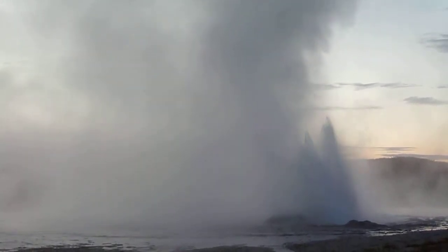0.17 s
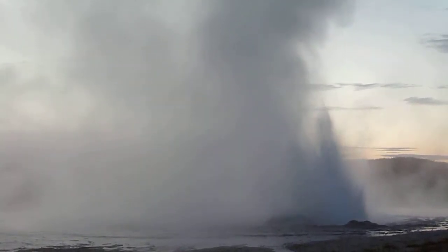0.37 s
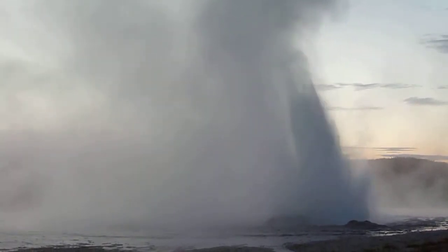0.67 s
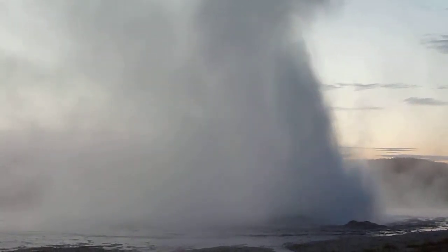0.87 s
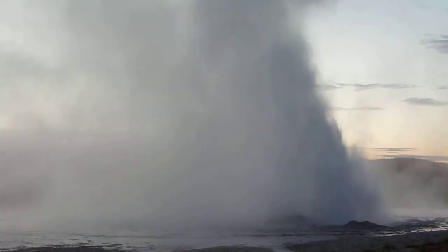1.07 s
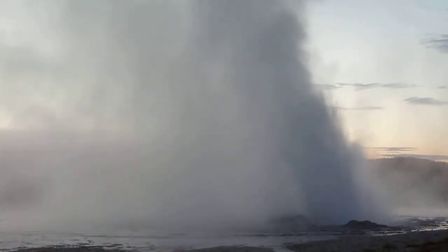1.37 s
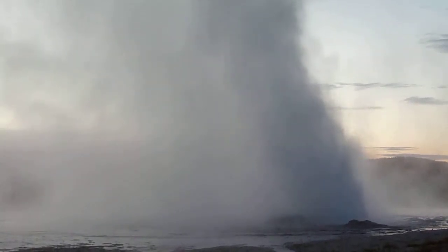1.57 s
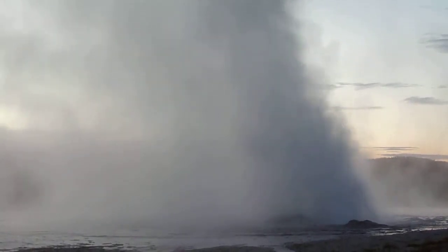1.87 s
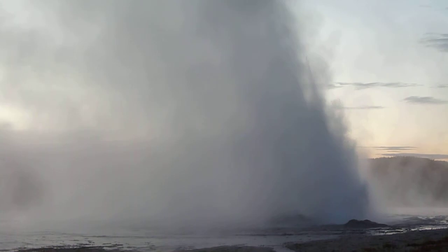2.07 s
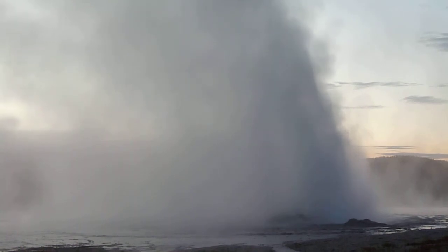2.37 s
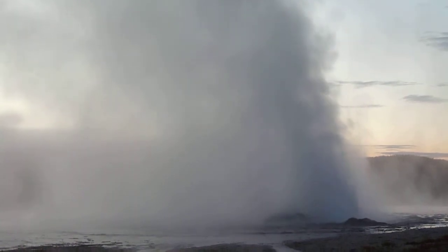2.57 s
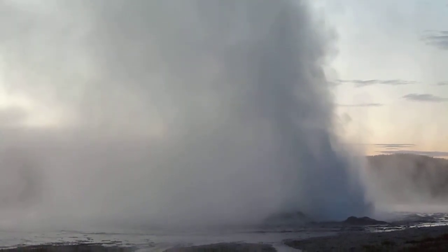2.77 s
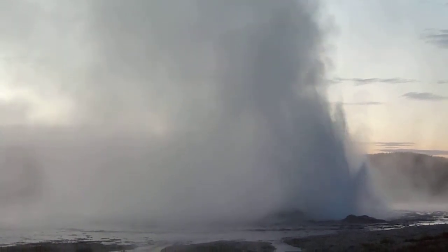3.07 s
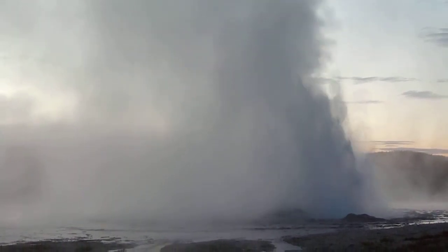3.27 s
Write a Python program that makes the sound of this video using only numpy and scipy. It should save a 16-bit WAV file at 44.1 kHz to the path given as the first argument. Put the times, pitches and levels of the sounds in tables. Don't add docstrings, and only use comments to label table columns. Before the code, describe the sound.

Geyser eruption outdoors, already under way and never stopping: dense watery hiss with fine crackle, airy jet roar and deep throbbing steam bursts, slightly dull on top, with occasional tiny handling ticks on the stereo microphones.

```python
import sys
import numpy as np
from scipy import signal
from scipy.fft import rfft, irfft
from scipy.io import wavfile
from scipy.ndimage import uniform_filter1d

SR = 44100
rng = np.random.default_rng(int(sys.argv[2]) if len(sys.argv) > 2 else 0)


def volts_from_decibels(level):
    exponent = np.asarray(level, float) / 20
    return 10 ** exponent


def dump(signal):
    limited = np.clip(np.atleast_2d(signal).T, -1, 1)
    pcm = np.round(limited * 32767).astype(np.int16)
    wavfile.write(sys.argv[1], SR, pcm)


N = 150822
HZ = np.fft.rfftfreq(N, 1 / SR)

# frequency in Hz, density in dB per Hz.
SCATTER_SPECTRUM = [(60, 0), (250, 2), (600, 3), (1000, 2), (2000, 0), (4500, 1.5), (6200, -2), (7400, -9)]
# start in seconds, peak in dB, centre in Hz, rattle hold in seconds,
# left over right in dB.
HOUSING_TICKS = [
    (.4152, -19.5, 1300, .0005, 3),
    (.4234, -23, 1200, .001, 2),
    (.4366, -17, 1300, .001, 2),
    (1.3885, -17.5, 3600, .005, 5),
    (1.4074, -22, 2300, .006, 5),
    (1.6560, -13.5, 3400, .016, 5),
    (2.4360, -28, 1200, .0005, 2),
    (2.4645, -28, 5200, .004, 0),
    (2.4705, -25.5, 850, .005, 2),
]
# frequency in Hz, level in dB, 60 dB decay time in seconds.
HOUSING_MODES = [(450, -2, .012), (800, -1, .012), (1150, -1, .009), (1580, 0, .016), (2000, -2, .006),
                 (2450, -1, .007), (2900, -1, .007), (3700, 0, .008), (4500, -2, .008), (5300, 2, .009),
                 (6100, -3, .006), (6800, -5, .006)]
# frequency in Hz, density in dB per Hz.
SPRAY_SPECTRUM = [(900, -5.5), (1500, -3.5), (2100, -4), (2800, 1.5), (5300, -1.5), (6800, -4.5),
                  (7500, -11.5), (7850, -29)]
# time in seconds, level in dB.
SPRAY_FALL = [
    (0.0, -40),
    (0.31, -39.5),
    (1.56, -38),
    (1.66, -39),
    (2.37, -41),
    (2.76, -39),
    (3.42, -40.5),
]
# time in seconds, lift in dB, length in seconds.
SPLASHES = [
    (0.27, 3.5, 0.0069),
    (0.378, 4, 0.0096),
    (0.401, 3.5, 0.02),
    (1.93, 2.5, 0.013),
    (2.108, 3, .04),
    (2.45, 1.5, .06),
    (2.722, 1.5, .015),
    (2.8, 2, 0.1),
    (2.951, 4, .02),
    (3.253, 2, .04),
]
# frequency in Hz, density in dB per Hz.
ROAR_SPECTRUM = [(200, -7.5), (280, -3), (320, -3.5), (560, -1.5), (695, -10), (1050, -10), (1280, -19.5),
                 (1500, -21.5)]
# frequency in Hz, density in dB per Hz.
RUMBLE_SPECTRUM = [(22, -16), (60, 0), (100, 0), (156, 0), (194, -1), (263, -2), (301, -14.5), (360, -24)]
# frequency in Hz, width in Hz, lift in dB.
VENT_RINGS = [(150, 53, 2.5), (241.7, 34, 3), (264, 22, 2.5)]
# time in seconds, lift in dB, length in seconds.
STEAM_BURSTS = [(.05, 0, 0.11), (.2, 2.5, 0.11), (.36, 8.5, 0.1), (.42, 6.5, 0.085), (.52, 6.5, 0.11),
                (.68, 6.5, 0.079), (.87, 4, 0.31), (1.02, 3, .1), (1.27, 9.5, 0.069), (1.345, 12.5, 0.074),
                (1.41, 10, 0.079), (1.52, 6.5, .07), (1.61, 7.5, 0.075), (1.69, 5, 0.067), (1.81, 7.5, .06),
                (1.87, 4, 0.072), (1.98, 2, 0.088), (2.11, 7, 0.062), (2.3, 4, 0.049), (2.44, 3.5, 0.043),
                (2.52, 5.5, 0.098), (2.72, 6, 0.12), (2.81, 9.5, .08), (2.9, 3.5, 0.058), (3.035, 8, .04),
                (3.15, 8.5, .06), (3.23, 5.5, 0.11)]
# delay in ms, strength as a ratio, centre in Hz, width in Hz.
NEAR_ECHOES = [(2.367, 0.38, 1750, 590), (2.17, 0.41, 5360, 1800)]
# frequency in Hz, left lead in radians.
LEFT_LEAD = [(0, 0.08), (2330, 0.71), (3450, 0.5), (3790, 0.6), (7410, 0.16), (8350, 0.05)]
# frequency in Hz, left over right in dB.
LEFT_TILT = [(60, 1.5), (160, 0.5), (430, 1.5), (1150, 1.5), (3070, -1), (8200, 0.5)]
# frequency in Hz, level in dB.
MIRROR_IMAGE = [(8000, 0.5), (8250, -5), (8500, -20), (8850, -19), (9000, -58), (9100, -90)]


def rms_one(x):
    return x / np.sqrt(np.mean(x ** 2) + 1e-20)


def at_hz(points, hz):
    f, v = np.transpose(points)
    return np.interp(np.log(hz + 1), np.log(f + 1), v)


def drift(rate_hz):
    pole = np.exp(-80 * np.pi * rate_hz / SR)
    white = rng.standard_normal(N // 40 + 2002)
    slow = signal.lfilter([1], [1, -2 * pole, pole * pole], white)[2000:]
    return np.interp(np.arange(N) / 40, np.arange(len(slow)), rms_one(slow))


def colour(x, points, skirt_db):
    below, above = points[0][0] / (HZ + 1), HZ / points[-1][0]
    octaves_beyond = np.maximum(0, np.log2(np.maximum(below, above)))
    gain_db = at_hz(points, HZ) - skirt_db * octaves_beyond
    return rms_one(irfft(rfft(x) * volts_from_decibels(gain_db), N))


def patchy(low_hz, high_hz, shared_db, own_db, shared_hz, own_hz):
    shared = drift(shared_hz)
    white = rfft(rng.standard_normal(N))
    out = np.zeros(N)
    for centre in np.arange(np.log2(low_hz), np.log2(high_hz), .5):
        band = np.clip(1 - 2 * abs(np.log2(HZ + 1) - centre), 0, 1)
        flicker_db = shared_db * shared + own_db * drift(own_hz)
        out += volts_from_decibels(flicker_db) * irfft(white * band, N)
    return out


def swells(rows):
    t = np.arange(N) / SR
    return sum(db * np.exp(-(2 * (t - s) / length_s) ** 2) for s, db, length_s in rows)


def scattered(fall_db):
    whites = rng.standard_normal((2, N))
    around = np.array([colour(white, SCATTER_SPECTRUM, skirt_db=50.5) for white in whites])
    return volts_from_decibels(-49 + fall_db - fall_db.mean()) * around


def ring_housing(push, centre_hz):
    span_octaves = .5 + .3 * centre_hz / 1000
    ring = np.zeros_like(push)
    for k, (mode_hz, mode_db, t60_s) in enumerate(HOUSING_MODES):
        r, w = volts_from_decibels(-60 / (t60_s * SR)), 2 * np.pi * mode_hz / SR
        near = np.exp(-.5 * (np.log2(mode_hz / centre_hz) / span_octaves) ** 2)
        mode = signal.lfilter([0, np.sin(w)], [1, -2 * r * np.cos(w), r * r], push)
        ring += (-1) ** k * near * volts_from_decibels(mode_db) * mode
    return ring


def housing_ticks():
    contact_s, click_db = .0007, 16
    rattle_db, rattle_fade_s = -10.5, .002
    out, t = np.zeros((2, N + SR)), np.arange(3000) / SR
    contact = t / contact_s * np.exp(1 - t / contact_s)
    for s, peak_db, centre_hz, rattle_s, pan_db in HOUSING_TICKS:
        noise = rng.standard_normal((3, len(t)))
        rattle = volts_from_decibels(rattle_db) * np.exp(-np.maximum(t - rattle_s, 0) / rattle_fade_s)
        push = (noise[0] + .5 * noise[1:]) * (contact + rattle)
        push[:, round(contact_s * SR)] += volts_from_decibels(click_db)
        ring = ring_housing(push, centre_hz)
        side_db = np.array([[.5], [-.5]]) * pan_db
        i = int(s * SR)
        out[:, i:i + len(t)] += ring / abs(ring.mean(axis=0)).max() * volts_from_decibels(peak_db + side_db)
    return out[:, :N]


def spray(fall_db, swing_db):
    drops_per_s, drop_spread_db, drops_db = 1200, 5, -18.5
    surge_share = 0.054
    sizes = volts_from_decibels(drop_spread_db * np.minimum(rng.exponential(1, N), 5)) * rng.choice([-1, 1], N)
    landed = rng.random(N) < drops_per_s * volts_from_decibels(3 * drift(8)) / SR
    drops = rms_one(sizes * landed)
    hiss = rms_one(patchy(620, 11000, shared_db=0.18, own_db=0.72, shared_hz=12, own_hz=8.2))
    water = colour(hiss + volts_from_decibels(drops_db) * drops, SPRAY_SPECTRUM, skirt_db=52.5)
    return volts_from_decibels(fall_db + surge_share * swing_db) * water


def roar(swing_db):
    level_db, surge_share = -38, 0.36
    torn_air = patchy(150, 2500, shared_db=0.38, own_db=0.46, shared_hz=27, own_hz=6)
    return volts_from_decibels(level_db + surge_share * swing_db) * colour(torn_air, ROAR_SPECTRUM, skirt_db=9)


def rumble(burst_db):
    level_db = -37
    evened, even_s = 0.56, 0.024
    lift_db = sum(db / (1 + ((HZ - hz) / width_hz * 2) ** 2) for hz, width_hz, db in VENT_RINGS)
    lumps = patchy(20, 500, shared_db=0.45, own_db=1.0, shared_hz=21, own_hz=7)
    lumps = colour(lumps, RUMBLE_SPECTRUM, skirt_db=32.5)
    lumps = rms_one(irfft(rfft(lumps) * volts_from_decibels(lift_db), N))
    span = int(even_s * SR)
    power = uniform_filter1d(uniform_filter1d(lumps ** 2, span), span)
    return volts_from_decibels(level_db + burst_db) * rms_one(lumps / (power + .01) ** (evened / 2))


def at_microphones(x):
    echo = np.zeros(len(HZ), complex)
    for delay_ms, strength, centre_hz, width_hz in NEAR_ECHOES:
        band = np.exp(-((HZ - centre_hz) / width_hz) ** 2)
        echo += strength * band * np.exp(-2j * np.pi * HZ * delay_ms / 1000)
    lead_rad = np.interp(HZ, *np.transpose(LEFT_LEAD))
    half = volts_from_decibels(at_hz(LEFT_TILT, HZ) / 2) * np.exp(.5j * lead_rad)
    return irfft(rfft(x) * (1 - echo) * np.array([half, 1 / half]), N)


def scene():
    burst_db, splash_db = swells(STEAM_BURSTS), swells(SPLASHES)
    swing_db = burst_db - burst_db.mean()
    fall_db = np.interp(np.arange(N) / SR, *np.transpose(SPRAY_FALL))
    water = spray(fall_db + splash_db, swing_db)
    jet = roar(swing_db) * volts_from_decibels(0.45 * splash_db)
    ahead = water + jet + rumble(burst_db)
    return scattered(fall_db) + housing_ticks() + at_microphones(ahead)


def band_limit(x):
    return signal.sosfilt(signal.butter(12, 8800, fs=SR, output="sos"), x)


def record(dry):
    fold_hz, null_hz = 8000, 90
    width_end_hz, width_fall_hz = 7580, 30
    spec = rfft(dry) * (1 - np.exp(-((fold_hz - HZ) / null_hz) ** 2)) * (HZ < fold_hz)
    mid = spec.mean(axis=0)
    narrowing = 1 + np.exp(np.clip((HZ - width_end_hz) / width_fall_hz, -50, 6))
    spec = mid + (spec - mid) / narrowing
    fold = int(np.searchsorted(HZ, fold_hz))
    image_gain = volts_from_decibels(np.interp(HZ[fold:2 * fold], *np.transpose(MIRROR_IMAGE)))
    spec[:, fold:2 * fold] = np.conj(spec[:, fold:0:-1]) * image_gain
    return band_limit(irfft(spec, N))


dry = scene()
out = record(dry)
dump(out)
```